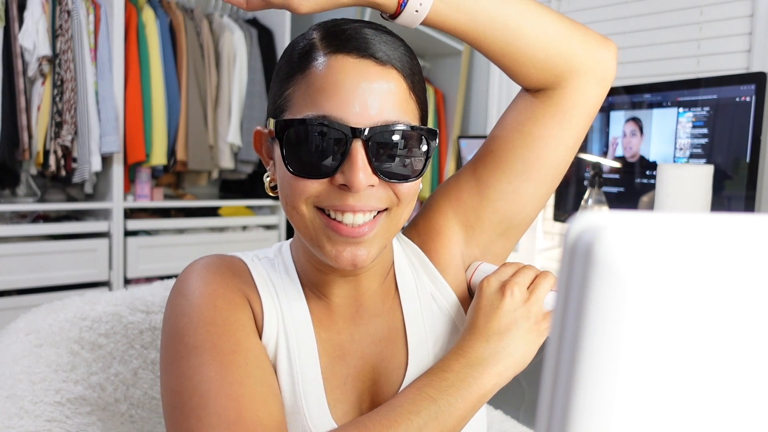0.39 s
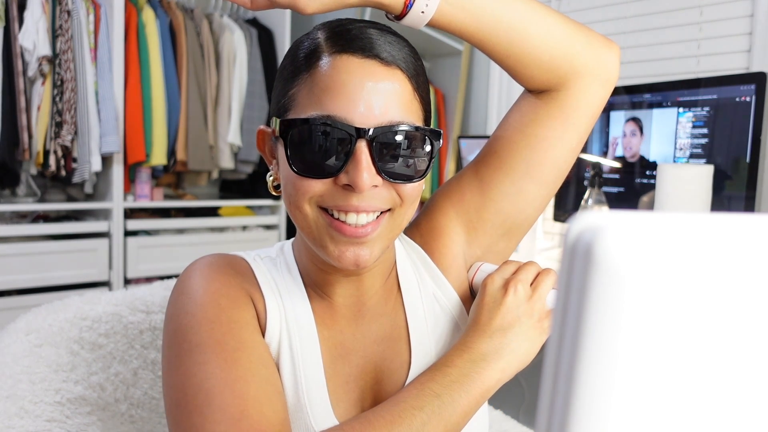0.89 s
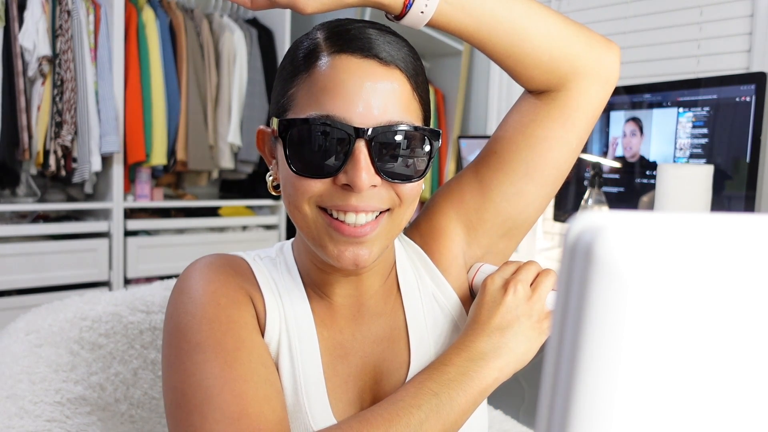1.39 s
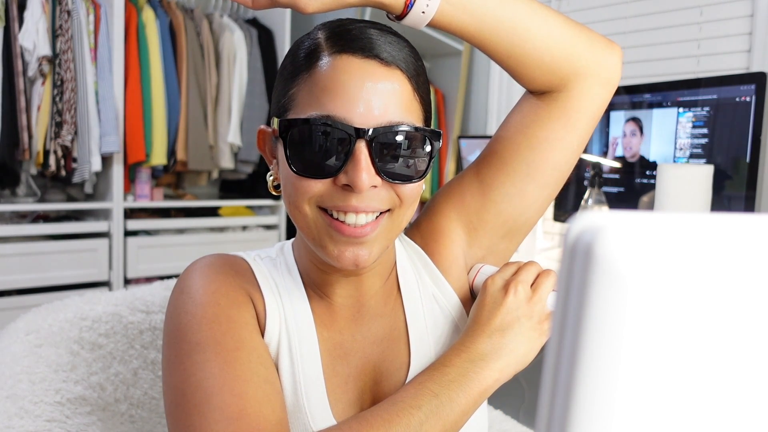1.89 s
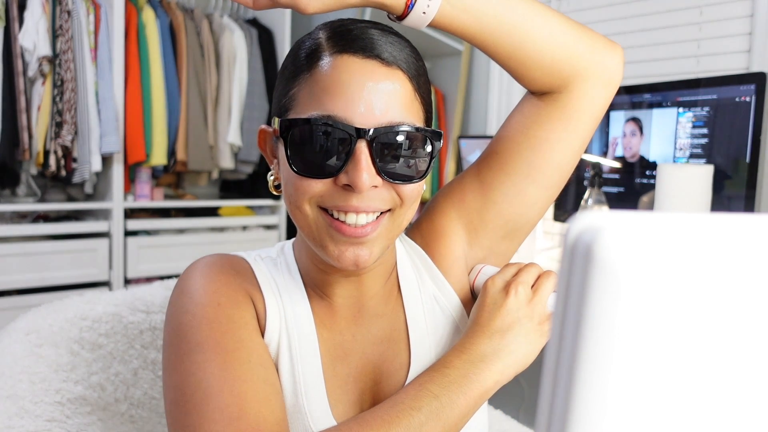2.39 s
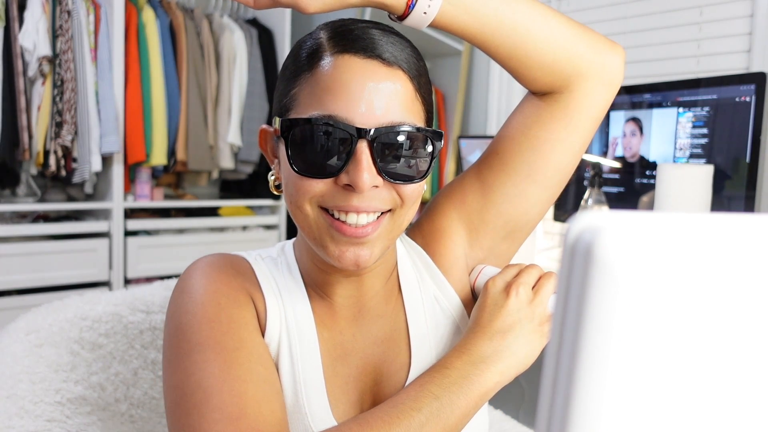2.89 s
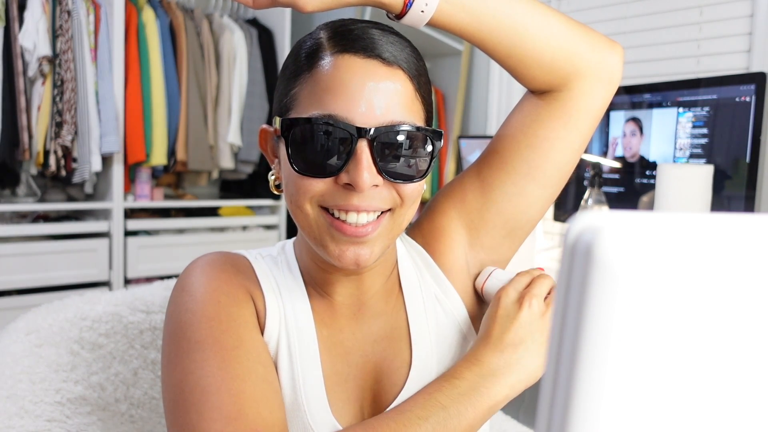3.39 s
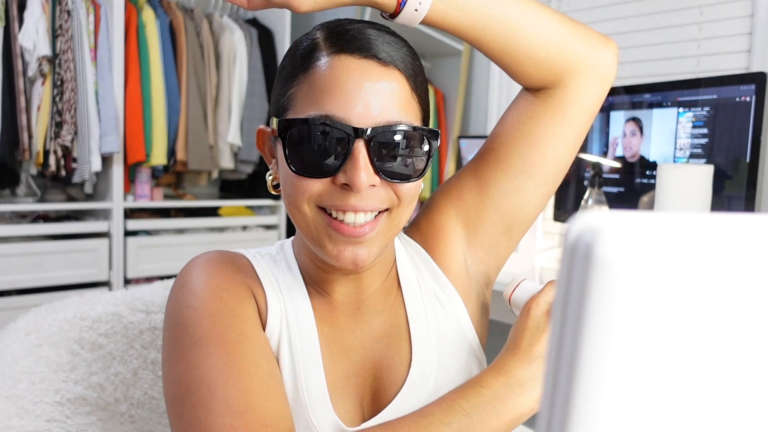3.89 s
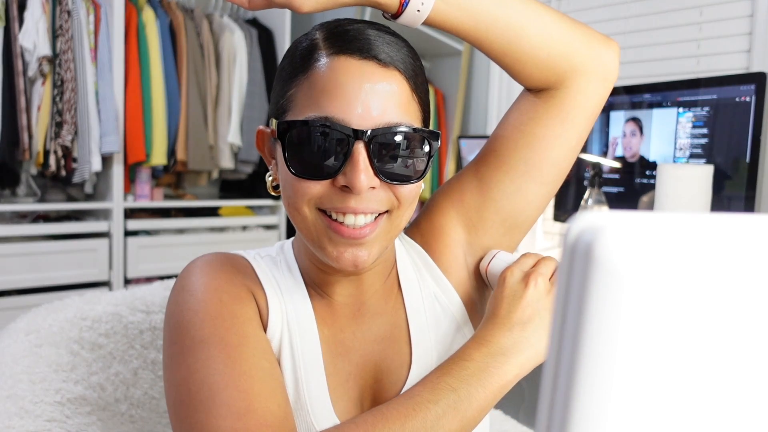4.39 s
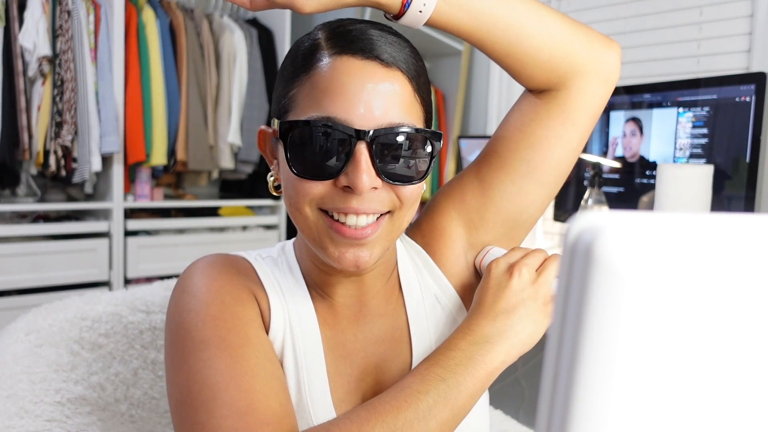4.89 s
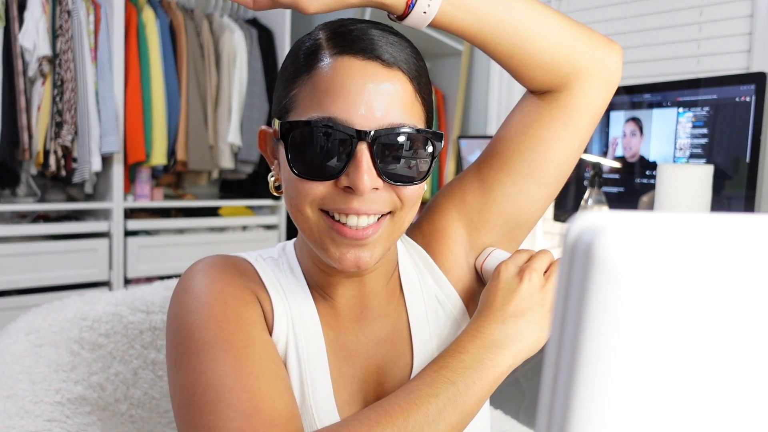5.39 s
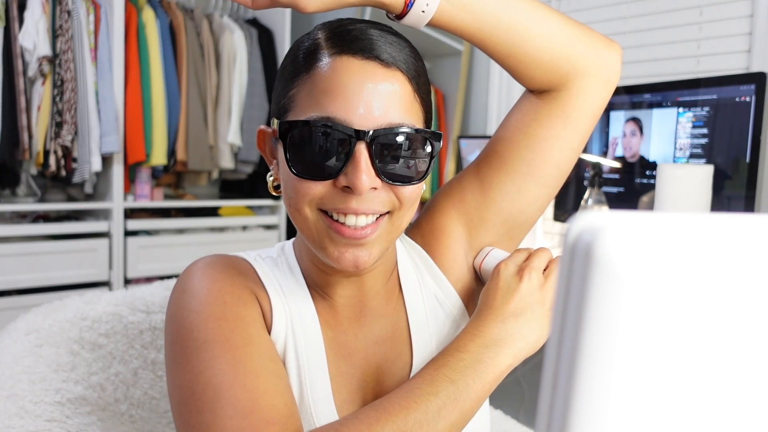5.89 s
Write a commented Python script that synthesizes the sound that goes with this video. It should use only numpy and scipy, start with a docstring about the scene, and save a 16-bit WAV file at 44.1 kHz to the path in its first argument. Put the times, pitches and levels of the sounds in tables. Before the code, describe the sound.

A hand-held hair remover runs close by in a furnished room, its little fan giving a constant airy hiss with a faint trembling whine. Before two seconds the trigger clicks, the lamp ticks and the trigger snaps back. The whine sinks, then recovers. Around four seconds the hiss swells brighter as the device leaves the skin, then settles. Another click and tick come near the end.

```python
"""The small cooling fan of a hand-held flash-lamp hair remover rushes on in a furnished room: noise shaped by air ducts.
Its blades add a thin, trembling whine, a sine and its octave, which sinks in pitch while the lamp recharges.
The trigger clicks down, the lamp ticks and the trigger snaps back: short pushes and rattles strike ringing parts.
Lifting the handset off the skin opens its window, brightens the hiss and adds a faint whistle of narrow noise.
The clicks echo in the room, and a low murmur of the house lies beneath."""
import sys
import numpy as np
from scipy import signal
from scipy.fft import rfft, irfft
from scipy.io import wavfile

SR = 44100
rng = np.random.default_rng(int(sys.argv[2]) if len(sys.argv) > 2 else 0)


def gain_from_db(level_db):
    """Convert decibel levels to linear amplitude factors (20 dB per decade)."""
    decades = np.asarray(level_db, float) / 20
    return 10 ** decades


def wrap_up_sound(samples):
    """Save the sound to the file named by the first command line argument, as 16-bit audio."""
    columns = np.atleast_2d(samples).T
    # keep every value between -1 and 1, then stretch to whole-number steps
    tamed = np.clip(columns, -1, 1)
    steps = np.round(tamed * 32767).astype(np.int16)
    wavfile.write(sys.argv[1], SR, steps)


N = 264978   # length of the scene in samples


def rms_one(x):
    """Scale a sound to an rms of one."""
    return x / np.sqrt(np.mean(x ** 2) + 1e-20)


def at_hz(points, hz):
    """Read a curve of (frequency, value) points, joined by straight lines on a log-frequency axis."""
    point_hz, values = np.transpose(points)
    return np.interp(np.log(hz), np.log(point_hz), values)


def drift(rate_hz):
    """Random wandering with an rms of one: noise smoothed by two equal low-pass stages."""
    # worked out only at every 40th sample, then joined up by straight lines
    pole = np.exp(-2 * np.pi * rate_hz * 40 / SR)
    noise = rng.standard_normal(N // 40 + 2002)
    slow = signal.lfilter([1], [1, -2 * pole, pole * pole], noise)[2000:]
    return np.interp(np.arange(N) / 40, np.arange(len(slow)), rms_one(slow))


# how alike the two channels are: (frequency [Hz], left-right correlation [0-1])
CHANNEL_LIKENESS = [(25, .85), (60, 0.74), (250, 0.47), (500, 0.67), (1000, 0.88), (2000, 0.96), (4000, 1),
                    (8000, 0.98), (14000, 0.93)]
# balance of the two channels: (frequency [Hz], left minus right [dB])
CHANNEL_BALANCE = [(100, 1.5), (250, 1), (500, -0.9), (4000, -1.1), (8000, -1.5)]


def stereo_noise(colour_db, hz):
    """Spectra of left and right noise: a shared part and an opposed part set how alike they are."""
    shared, opposed = rfft(rng.standard_normal((2, N)))
    alike = np.clip(at_hz(CHANNEL_LIKENESS, hz), 0, 1)
    sides = np.array([[1], [-1]])
    pair = np.sqrt(1 + alike) * shared + np.sqrt(1 - alike) * opposed * sides
    return pair * gain_from_db(colour_db + sides * at_hz(CHANNEL_BALANCE, hz) / 2)


# broad colour of the rushing air: (frequency [Hz], relative level [dB per Hz])
AIR_COLOUR = [(400, -19.5), (600, -10.5), (1000, -7.5), (1700, -8.5), (2700, -7), (3600, -17.5),
              (4200, -10), (5000, -15.5), (6000, -19.5), (7500, -26), (8300, -32), (10000, -35.5),
              (12000, -39.5), (16000, -41.5)]


def air_colour(hz):
    """Colour of the rushing air before the ducts shape it, with almost no bass."""
    return at_hz(AIR_COLOUR, hz) - 60 * (hz < 300)


# resonances (+) and cancellations (-) of shell, vents and nearby surfaces:
# (frequency [Hz], width [Hz], height [dB])
DUCT_PEAKS = [(781, 114, 7), (970, 30, 0), (1110, 63, -0.5), (1236, 12, 7.5), (1343, 136, 8),
              (1549, 72, 7.5), (1635, 37, -4.5), (1825, 48, 8.5), (1926, 21, 9.5), (2045, 16, 11.5),
              (2154, 37, 6.5), (2259, 68, 12.5), (2376, 27, 5.5), (2450, 58, 3), (2630, 30, 7.5),
              (3016, 52, 4), (3450, 95, 3), (3760, 270, -2), (3938, 24, 11), (4036, 53, 4), (4426, 57, 5.5),
              (4700, 49, -4.5), (4820, 36, -4), (5170, 87, -3.5), (5530, 140, 5), (5540, 60, -9),
              (6360, 170, -8.5), (6680, 210, 5), (6980, 140, -5.5), (7260, 120, 3), (7450, 100, -2),
              (7630, 250, 2), (8400, 110, 1.5), (8400, 150, -3), (9600, 320, 3)]


def duct_colour(hz):
    """Peaks and dips where the air paths strengthen or cancel the sound."""
    return sum(db / (1 + (2 * (hz - peak_hz) / width) ** 2) for peak_hz, width, db in DUCT_PEAKS)


# how the wrist aims the handset: (time [s], vents facing the microphone [dB], mean blade whine [dB])
WRIST_AIM = [(0, 1.5, -62), (.5, 0.3, -57.5), (1.3, -0.4, -58.5), (1.8, -0.5, -55.5), (2.05, -0.9, -62.5),
             (2.9, -1, -63), (3.2, 0, -59), (3.5, -2, -54.5), (3.57, -2.5, -66), (3.9, 0.4, -61),
             (4.25, -1, -64.5), (4.5, 0, -65), (4.78, -0.5, -66), (4.95, 0, -59), (5.65, -1, -52.5),
             (6.01, -1.8, -63.5)]


def wrist_aim():
    """Vent facing and whine level, one value per sample, as the wrist turns."""
    s, facing_db, whine_db = np.transpose(WRIST_AIM)
    t = np.arange(N) / SR
    return np.interp(t, s, facing_db), np.interp(t, s, whine_db)


# change of the hiss with the window wide open: (frequency [Hz], change [dB])
WINDOW_COLOUR = [(1500, -1), (1900, -3.5), (2300, -2.5), (2700, -7), (3100, -3.5), (3380, 0), (3700, 1),
                 (4500, 0.5), (8000, 1), (9000, 1), (10000, -1)]
# how far each pitch follows the vent facing: (frequency [Hz], share of the facing dB)
VENT_FOLLOWING = [(3000, -0.5), (4500, -0.2), (6300, 0.8), (9000, 0.3), (12000, -0.5)]


def grip_colour(hz, window, facing_db):
    """Level change of one band in dB as the window opens and the vents turn."""
    return window * at_hz(WINDOW_COLOUR, hz) + facing_db * at_hz(VENT_FOLLOWING, hz)


# the handset comes off the skin and is set down again:
# (time of widest window [s], lifting time [s], lowering time [s])
SKIN_LIFTS = [(-1.65, 0.66, .6), (4, 0.79, 0.32)]
# level at the widest moment, extra dB at the start of the lift, loss afterwards (times seconds squared)
GAP_DB, GAP_ONSET_DB, GAP_FADE_DB_PER_S2 = 4.5, -7, 3
# hiss pitch when the lift begins, pitch it heads for, time constant of the climb
GAP_START_HZ, GAP_END_HZ, GAP_CLIMB_S = 3970, 6680, 0.83


def lift():
    """Window opening 0-1, and pitch and relative level of the hiss at the gap, from the latest lift."""
    t = np.arange(N) / SR
    window, gap_hz, gap_db = np.zeros((3, N))
    for widest, rise, fall in SKIN_LIFTS:
        age = t - widest
        begun = age > -rise
        travel = np.clip(np.where(age < 0, -age / rise, age / fall), 0, 1)
        opening = np.cos(np.pi / 2 * travel) ** 2
        climb_hz = GAP_END_HZ - (GAP_END_HZ - GAP_START_HZ) * np.exp(-(age + rise) / GAP_CLIMB_S)
        change_db = np.where(age < 0, GAP_ONSET_DB * (1 - opening), -GAP_FADE_DB_PER_S2 * age ** 2)
        latest = [opening, climb_hz, GAP_DB + change_db]
        window, gap_hz, gap_db = np.where(begun, latest, [window, gap_hz, gap_db])
    return window, gap_hz, gap_db


# trigger pressed, the lamp flashing just after:
# (time [s], shell level [dB], shell ring time [share of free], flash delay [s])
TRIGGER_PRESSES = [(1.7172, -12.5, 0.67, .0294), (5.6971, -12.5, 0.96, .0418)]


def flash_times():
    """Every moment the lamp fires, the first one before the scene starts."""
    return [-2.4] + [s + delay for s, _, _, delay in TRIGGER_PRESSES]


BLADE_HZ = 4654   # blade-passing pitch at full speed
SAG_LIMIT_HZ, SAG_S, RECHARGE_S = 205, 1.1, .98   # the sag heads for its limit until the recharge ends
QUICK_SHARE, QUICK_S, SLOW_S = .62, .3, 2.0   # recovery, part quick and part slow


def blade_speed():
    """Blade-passing pitch in Hz: each recharge pulls it down, then it recovers, quickly at first."""
    sag_hz = np.zeros(N)
    for s in flash_times():
        age = np.arange(N) / SR - s
        pull = 1 - np.exp(-np.clip(age, 0, RECHARGE_S) / SAG_S)
        rest = np.clip(age - RECHARGE_S, 0, None)
        left = QUICK_SHARE * np.exp(-rest / QUICK_S) + (1 - QUICK_SHARE) * np.exp(-rest / SLOW_S)
        sag_hz += SAG_LIMIT_HZ * pull * left
    return BLADE_HZ - sag_hz


FAN_DB, FAN_DB_PER_HZ = -50, 0.0173   # level at full speed; loss per Hz that the blade pitch sags
GAP_SEALED_WIDTH_HZ, GAP_OPEN_WIDTH_HZ = 1040, 2000   # width of the gap hiss


def fan_air(flutter_db):
    """Turbulent air through the ducts, fluttering and recoloured band by band, and air escaping at the skin."""
    window, gap_hz, gap_db = lift()
    facing_db, _ = wrist_aim()
    hz = np.fft.rfftfreq(N, 1 / SR) + 1
    bare_db = air_colour(hz)
    air = stereo_noise(bare_db + duct_colour(hz), hz)
    escaping = stereo_noise(bare_db, hz)
    # the fan level is set by the air between 600 and 1600 Hz
    scale = np.std(irfft(air * ((hz > 600) & (hz < 1600)), N))
    gap_width_hz = GAP_SEALED_WIDTH_HZ + window * (GAP_OPEN_WIDTH_HZ - GAP_SEALED_WIDTH_HZ)
    centres = np.concatenate([np.arange(700, 8000, 380), [9000, 11000, 14000]])
    out, together = 0, drift(3.7)
    for k, centre in enumerate(centres):
        # overlapping triangles that sum to one
        mask = np.interp(hz, centres, np.arange(len(centres)) == k)
        flutter = gain_from_db(flutter_db * (0.65 * together + drift(2.8)))
        grip = gain_from_db(grip_colour(centre, window, facing_db))
        out = out + irfft(air * mask, N) * grip * flutter
        if 3500 < centre < 8000:
            # the gap between window and skin hisses in a broad, climbing band
            gap = gain_from_db(gap_db) * np.exp(-(2 * (centre - gap_hz) / gap_width_hz) ** 2)
            out = out + irfft(escaping * mask, N) * gap * flutter
    speed_db = FAN_DB - FAN_DB_PER_HZ * (BLADE_HZ - blade_speed())
    return out * gain_from_db(speed_db) / scale


def blade_whine():
    """The blade-passing tone and its octave, pitch and level trembling."""
    _, whine_db = wrist_aim()
    pitch_hz = blade_speed() + 4.24 * drift(21.2)
    phase = 2 * np.pi * np.cumsum(pitch_hz) / SR
    tone = np.sin(phase) + gain_from_db(-38) * np.sin(2 * phase)
    level_db = whine_db + 1.64 * drift(21.0)
    return np.sqrt(2) * gain_from_db(level_db) * tone


WHISTLE_HZ, WHISTLE_WIDTH_HZ, WHISTLE_DB = 3366, 43, -64   # width of one pass; level with the window wide open


def window_whistle():
    """Noise twice through a narrow resonance, heard while the window is off the skin."""
    r, w = np.exp(-np.pi * WHISTLE_WIDTH_HZ / SR), 2 * np.pi * WHISTLE_HZ / SR
    section = [1, 0, -1, 1, -2 * r * np.cos(w), r * r]
    tone = rms_one(signal.sosfilt([section, section], rng.standard_normal(N)))
    window, _, _ = lift()
    return gain_from_db(WHISTLE_DB) * window ** 2 * tone


def ring(push, modes, share):
    """A push strikes every mode, a decaying sine; a smaller share of the free ring time damps it sooner."""
    out = np.zeros(len(push))
    for hz, level_db, t60 in modes:
        r, w = gain_from_db(-60 / (share * t60 * SR)), 2 * np.pi * hz / SR
        # the tiny offset keeps the filter clear of slow, vanishing numbers
        out += signal.lfilter([0, gain_from_db(level_db) * np.sin(w)], [1, -2 * r * np.cos(w), r * r], push + 1e-18)
    return out


# ringing of the plastic shell: (frequency [Hz], relative level [dB], free time to fall 60 dB [s])
SHELL_MODES = [(820, -15, 0.029), (1070, -19, 0.0098), (1334, -5.5, 0.015), (1245, -21.5, 0.087),
               (1860, -9, 0.012), (2250, -15.5, 0.022), (2740, -18.5, 0.014), (3620, -16.5, 0.0085)]
# ringing of the lamp tube: (frequency [Hz], relative level [dB], time to fall 60 dB [s])
LAMP_MODES = [(4130, 3.5, 0.012), (4750, 2.5, .005), (5660, -1, 0.0072), (8100, -8, 0.0061),
              (9150, -13, 0.014), (9770, -12.5, 0.02)]
# ringing of the trigger: (frequency [Hz], relative level [dB], time to fall 60 dB [s])
TRIGGER_MODES = [(3080, 1, 0.0054), (4100, -9, 0.0076), (5420, -0.5, 0.016), (6200, -5, .009),
                 (7020, -12, 0.026), (8100, -26, .007), (10300, -15, 0.0084), (13200, -27, .004)]


def click_parts(push, rattles, share, swing, lamp_db, trigger_db):
    """A push rocks the shell, its first swing up or down; rattles ring the lamp tube and the trigger."""
    tube, spring = rattles
    shell = np.sign(swing) * ring(push, SHELL_MODES, share)
    lamp = gain_from_db(lamp_db) * ring(tube, LAMP_MODES, 1)
    trigger = gain_from_db(trigger_db) * ring(spring, TRIGGER_MODES, 1)
    return shell + lamp + trigger


# trigger springing back: (time [s], shell level [dB])
TRIGGER_RELEASES = [(1.9875, -10.5)]
# faint tap of the shell: (time [s], shell level [dB])
SHELL_TAPS = [(3.0856, -25.5)]
# what each kind of click excites, levels relative to its shell level:
# (first swing [only the sign counts], lamp [dB], trigger [dB], crack [dB])
PRESS_MIX = (3, -27.5, -38, -16)
FLASH_MIX = (3, -15, -32, -25)
RELEASE_MIX = (-1.5, -42, -17.5, -16)
TAP_MIX = (-1, -21, -22, -18)
FLASH_SHELL_DB, FIRM_GRIP_SHARE, TAP_SHARE = -18.5, 0.43, 0.42   # shares of the free ring time
RATTLE_S = .0006   # moment the rattle is strongest


def handset_clicks():
    """A blunt push rocks the shell; a brief rattle rings the lamp tube and the trigger, and cracks."""
    clicks = [(s, db, share, *PRESS_MIX) for s, db, share, _ in TRIGGER_PRESSES]
    clicks += [(s, FLASH_SHELL_DB, FIRM_GRIP_SHARE, *FLASH_MIX) for s in flash_times()[1:]]
    clicks += [(s, db, FIRM_GRIP_SHARE, *RELEASE_MIX) for s, db in TRIGGER_RELEASES]
    clicks += [(s, db, TAP_SHARE, *TAP_MIX) for s, db in SHELL_TAPS]
    out, cracks, t = np.zeros(N), np.zeros(N), np.arange(SR // 5) / SR
    rattles = rng.standard_normal((len(clicks), 3, len(t)))
    # the rattle swells and dies within a few milliseconds
    rattles *= t / RATTLE_S * np.exp(1 - t / RATTLE_S) / np.sqrt(2 * RATTLE_S * SR)
    push = np.exp(-((t - .0003) / .00008) ** 2)
    push /= np.sum(push)
    for click, (tube, spring, snap) in zip(clicks, rattles):
        s, shell_db, share, swing, lamp_db, trigger_db, crack_db = click
        start = round(s * SR)
        at = slice(start, start + len(t))
        out[at] += gain_from_db(shell_db) * click_parts(push, (tube, spring), share, swing, lamp_db, trigger_db)
        cracks[at] += gain_from_db(shell_db + crack_db) * snap
    # the hand muffles the top; a shell this small radiates no bass
    muffle = signal.butter(2, 11000, fs=SR, output="sos")
    no_bass = signal.butter(6, 672, "high", fs=SR, output="sos")
    crack_band = signal.butter(1, [5500, 13000], "band", fs=SR, output="sos")
    out = signal.sosfilt(muffle, out + 1e-18)
    out = signal.sosfilt(no_bass, out)
    return out + signal.sosfilt(crack_band, cracks + 1e-18)


# how long the room rings: (frequency [Hz], time to fall 60 dB [s])
ROOM_RING = [(500, 0.11), (1500, 0.16), (4000, 0.27), (8000, 0.22), (11000, 0.3), (14000, 0.11)]
ROOM_DB = -3   # energy of the tail relative to the direct sound
WALL_ECHO_S, WALL_ECHO_DB = .0203, -9


def room(x):
    """One wall echo, treble only, and a diffuse tail of noise dying band by band."""
    size = SR // 2
    t, tail = np.arange(size) / SR, np.zeros((2, size))
    common, own = rng.standard_normal(size), rng.standard_normal((2, size))
    # half-octave bands
    for low_hz in 500 * 2. ** np.arange(0, 5, .5):
        band = signal.butter(2, [low_hz, low_hz * np.sqrt(2)], "band", fs=SR, output="sos")
        decay = gain_from_db(-60 * t / at_hz(ROOM_RING, low_hz))
        tail += signal.sosfilt(band, common + 0.25 * own) * decay
    # the tail builds up over 6.2 ms
    tail *= np.clip(t / 0.0062, 0, 1)
    tail = gain_from_db(ROOM_DB) * tail / np.sqrt(np.mean(np.sum(tail ** 2, axis=1)))
    treble = signal.butter(2, [3500, 10500], "band", fs=SR, output="sos")
    bright = signal.sosfilt(treble, x)
    echo = gain_from_db(WALL_ECHO_DB) * np.roll(bright, round(WALL_ECHO_S * SR))
    return signal.fftconvolve(x[None], tail, axes=1)[:, :N] + echo


# colour of the murmur of the house: (frequency [Hz], relative level [dB per Hz])
MURMUR_COLOUR = [(12, -68), (20, -30), (70, -16.5), (107, -12.5), (184, -4.5), (313, -7.5), (468, -11.5),
                 (536, -22), (621, -0.5), (700, -1.5), (910, -21), (1540, -120)]


def room_tone():
    """The low murmur of the house: coloured stereo noise at a steady -59.5 dB rms."""
    hz = np.fft.rfftfreq(N, 1 / SR) + 1
    murmur = irfft(stereo_noise(at_hz(MURMUR_COLOUR, hz), hz), N)
    return gain_from_db(-59.5) * rms_one(murmur)


def scene():
    """Whine, whistle and clicks slightly to the right, with the rushing air and the room."""
    clicks = handset_clicks()
    pan = gain_from_db(np.array([[-.55], [.55]]))   # left, right
    near = (clicks + blade_whine() + window_whistle()) * pan
    return near + room(clicks) + fan_air(flutter_db=0.79) + room_tone()


def low_pass(x):
    """Removes everything above the highest recorded frequency."""
    return signal.sosfilt(signal.butter(12, 15900, fs=SR, output="sos"), x)


def record(dry):
    """The microphone drops the lowest bass, below about 50 Hz."""
    low_cut = signal.butter(2, 50.0, "high", fs=SR, output="sos")
    mix = signal.sosfilt(low_cut, dry)
    return low_pass(mix)


dry = scene()
out = record(dry)
wrap_up_sound(out)
```